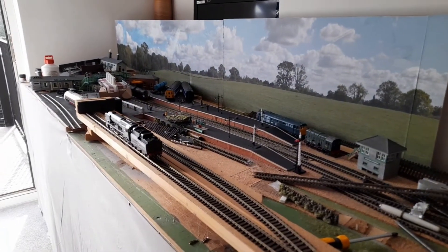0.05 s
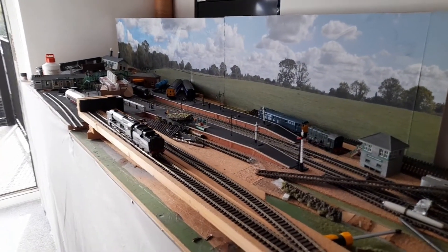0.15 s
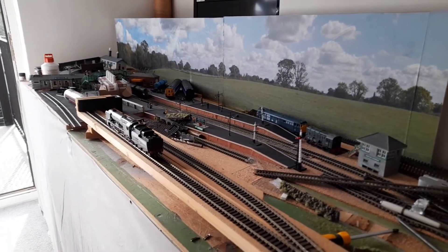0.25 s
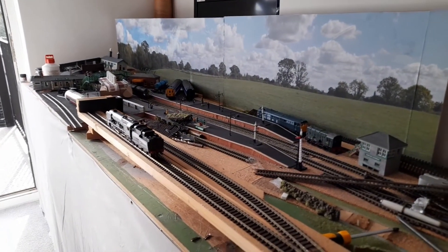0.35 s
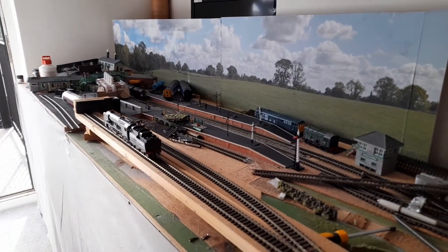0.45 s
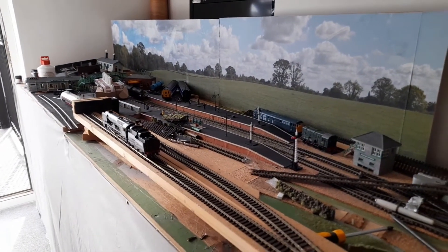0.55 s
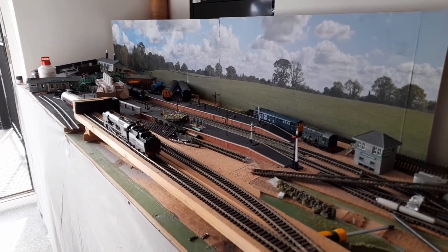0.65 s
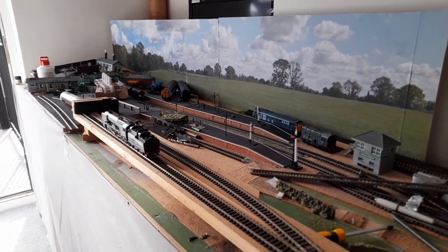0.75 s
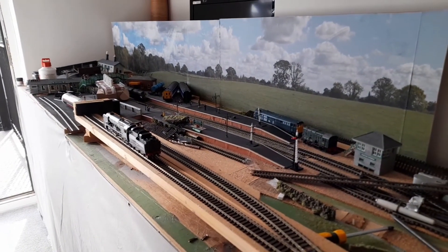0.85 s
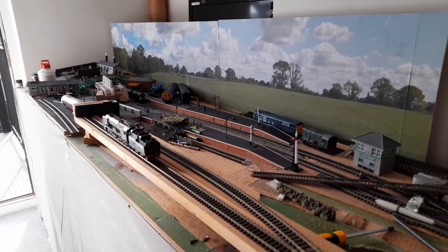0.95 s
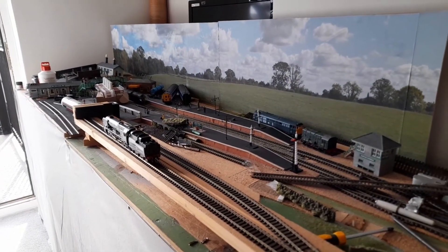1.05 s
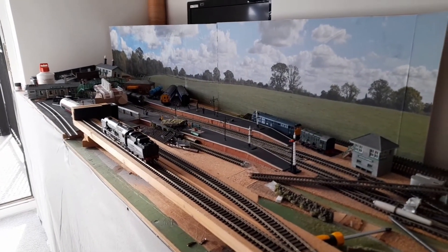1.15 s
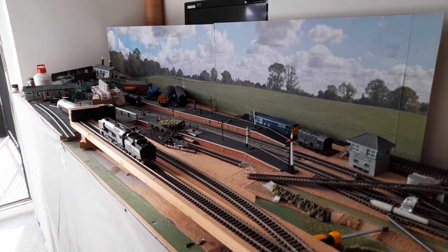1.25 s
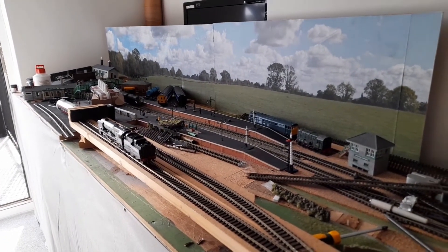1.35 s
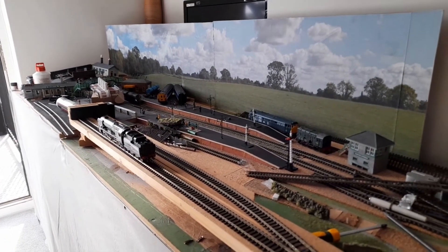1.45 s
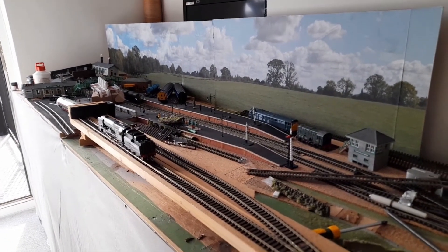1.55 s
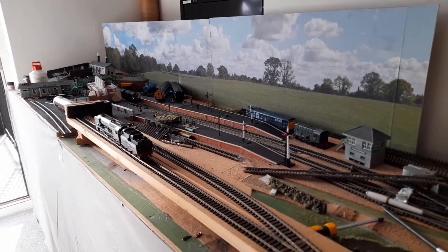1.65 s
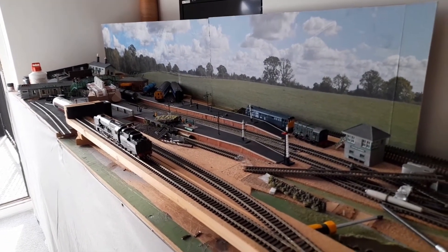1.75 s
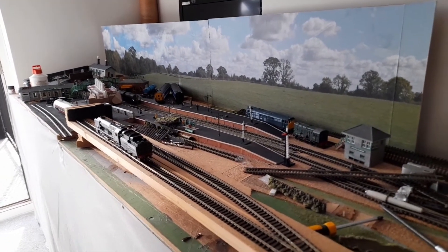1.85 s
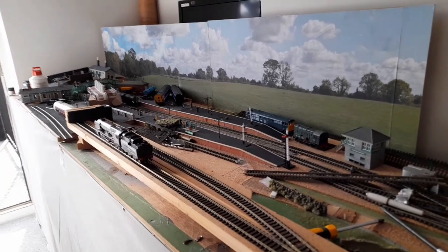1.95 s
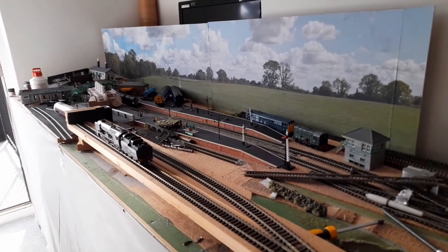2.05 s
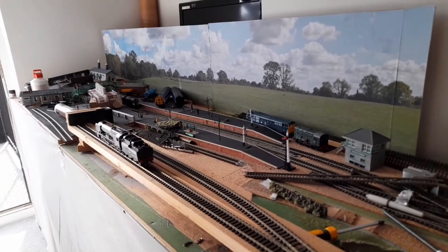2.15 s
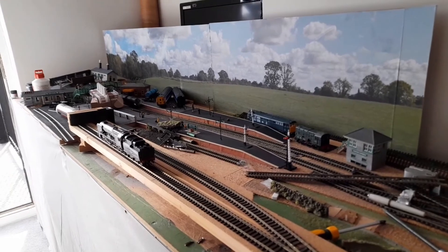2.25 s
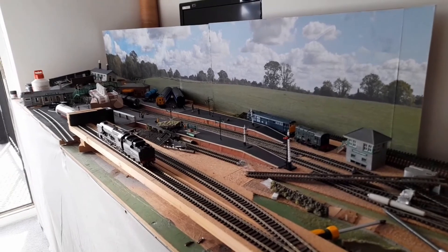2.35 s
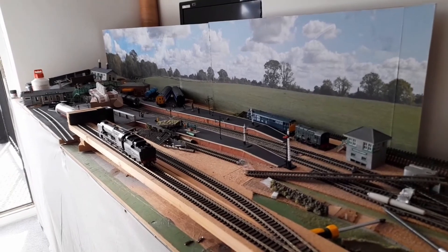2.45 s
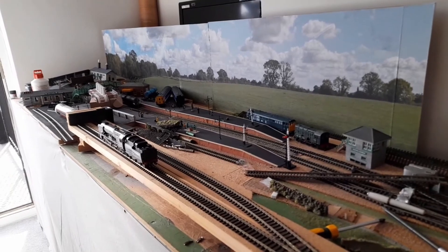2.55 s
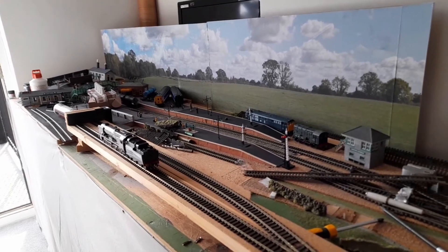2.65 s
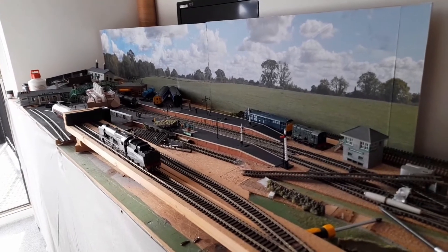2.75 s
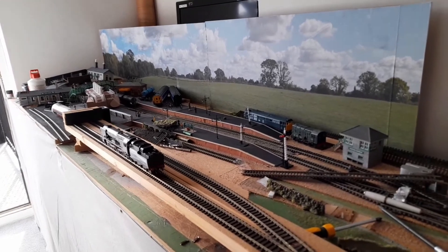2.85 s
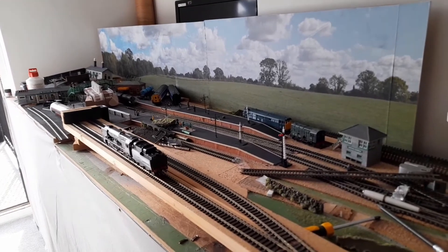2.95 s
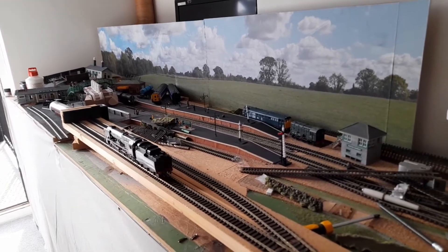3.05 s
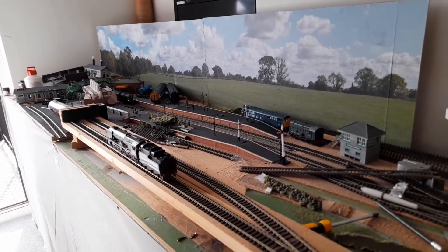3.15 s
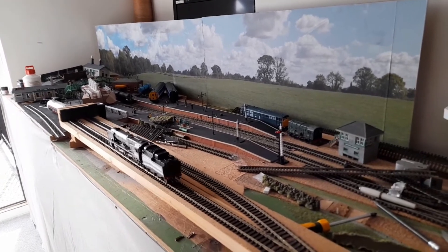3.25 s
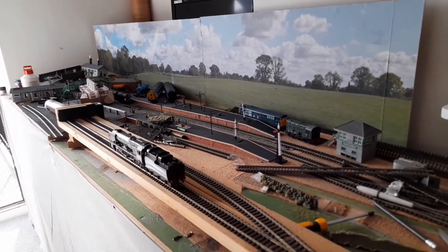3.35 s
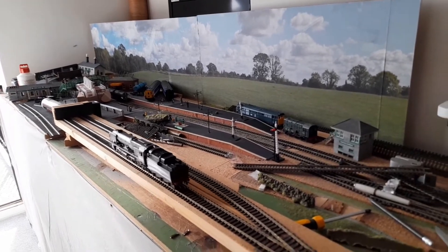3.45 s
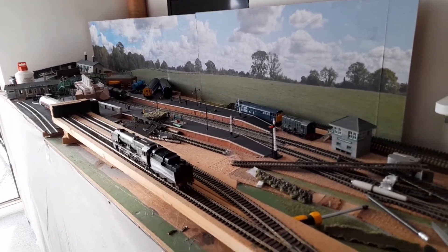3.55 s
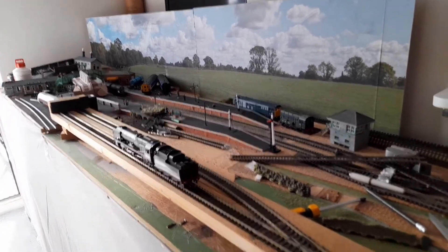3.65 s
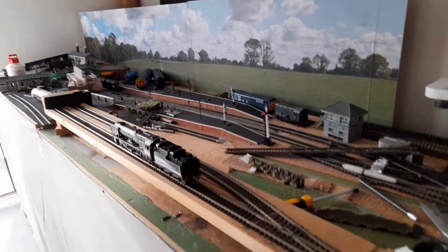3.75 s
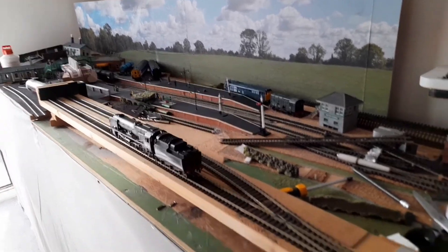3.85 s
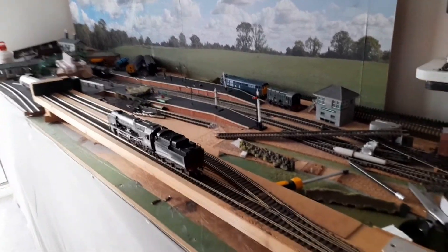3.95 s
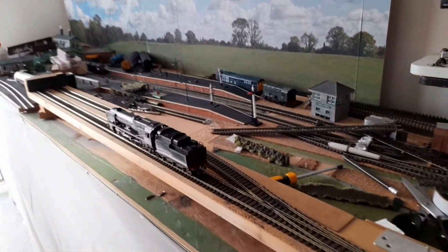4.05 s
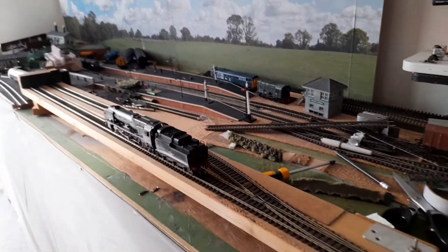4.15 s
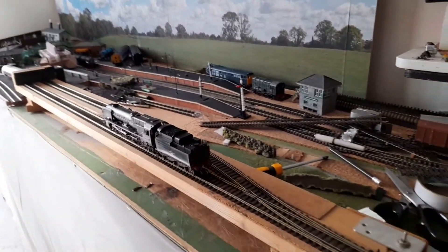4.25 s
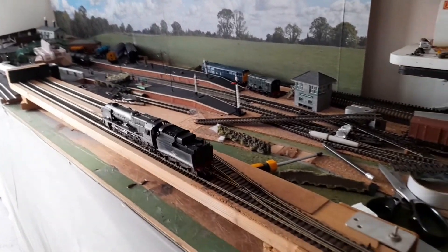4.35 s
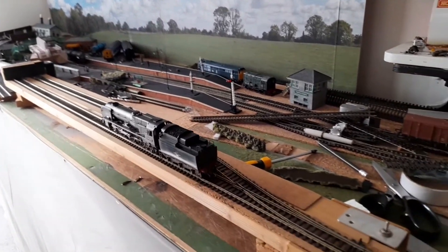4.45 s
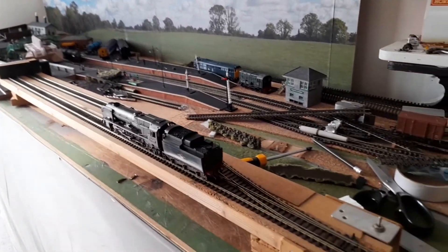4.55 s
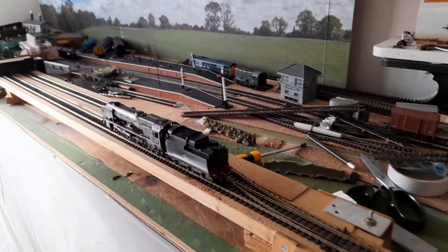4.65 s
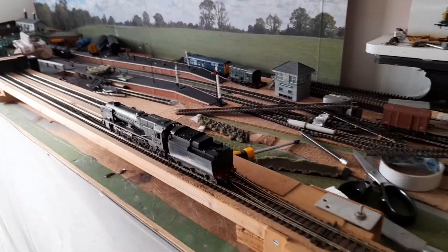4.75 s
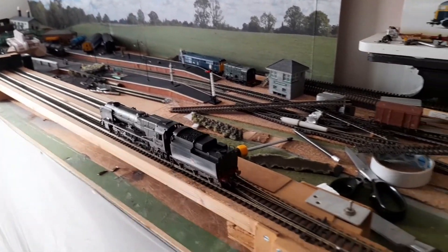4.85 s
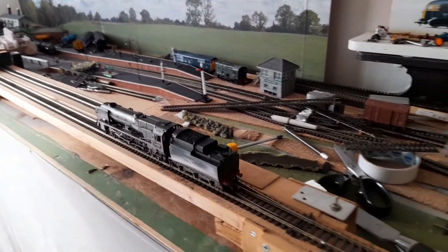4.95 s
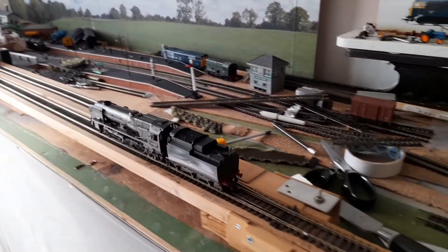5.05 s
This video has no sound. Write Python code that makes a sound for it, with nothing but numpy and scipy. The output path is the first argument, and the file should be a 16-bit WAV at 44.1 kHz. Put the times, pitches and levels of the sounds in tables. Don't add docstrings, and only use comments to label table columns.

```python
import sys
import numpy as np
from scipy import signal
from scipy.fft import rfft, irfft, next_fast_len
from scipy.io import wavfile
from scipy.ndimage import uniform_filter1d, map_coordinates

SR = 44100
rng = np.random.default_rng(int(sys.argv[2]) if len(sys.argv) > 2 else 0)


def to_wav(sig):
    pcm = np.clip(np.atleast_2d(sig), -1, 1) * 32767
    pcm = np.round(pcm).astype(np.int16)
    wavfile.write(sys.argv[1], SR, pcm.T)


def volts_from_decibels(level):
    exponent = np.asarray(level, float) / 20
    return 10 ** exponent


N = 224468

# time_s, level_db
DRIVE = [(2.45, -78), (2.55, -71), (2.65, -59.5), (2.75, -55), (2.85, -47), (2.97, -44.5), (3.14, -42.5),
         (3.26, -40.5), (3.42, -42.5), (3.55, -44), (3.72, -42.5), (3.88, -45), (4.05, -42.5), (4.4, -46),
         (4.55, -46), (4.75, -40), (4.95, -44), (5.09, -41)]
# start_s, end_s
NEARING_S = [3.25, 4.82]
# centre_hz, width_hz, level_db
SHELL_FAR = [(1017, 67, 1), (1227, 85, -1), (1343, 46, 6), (1552, 170, -4), (1777, 150, -0.5),
             (2150, 260, -6), (2980, 370, -12.5), (1230, 870, -10)]
SHELL_NEAR = [(1044, 39, 2), (1264, 41, 6.5), (1365, 56, 7), (1474, 150, 3), (1900, 107, 2),
              (2285, 160, -3), (2980, 1300, -13.5), (1400, 420, -11)]
# centre_hz, width_hz, level_db
TRESTLE = [(138.6, 22, -7.5), (230.7, 36, -3.5), (306.5, 38.4, 1)]
PANEL = [(360.4, 17, -2.5), (409, 36, -3)]
BED = [(533, 48, -0.5), (656, 42, -3.5), (708, 43, -3), (779, 38, -5.5), (878, 81, -3)]
# trestle_db, panel_db, bed_db
WOOD_DB = [-5.5, -8, -2]
WOOD_NEAR_DB = [-3, -2.5, -2.5]
# centre_s, length_s, rise_db
TRESTLE_SPANS = [(2.95, 0.41, 2.5), (3.14, 0.16, 5), (3.527, 0.27, 5.5), (3.71, 0.24, 4), (4.073, 0.36, 4),
                 (4.616, .12, 8.5), (4.864, 0.17, 1)]
PANEL_SPANS = [(2.86, 0.44, 5.5), (3.11, 0.057, 4), (3.33, .3, 6), (3.53, 0.21, 14.2), (3.87, 0.16, 5),
               (4.18, 0.18, 4.5), (4.35, 0.17, 5), (4.67, 0.25, 9.2)]
BED_SPANS = [(3.36, 0.23, 3.2), (3.56, 0.18, 3), (4.22, .15, 3.7), (4.84, 0.09, 3.5), (4.98, 0.14, 0.37)]
# freq_hz, density_db_per_hz
WHIR = [(1800, -18), (2600, -2), (3200, 0.5), (4100, 0.5), (4500, -2), (6200, -2), (7800, -12.5),
        (9000, -62)]

# start_s, peak_db, hardness_0_to_1
THROWN = [(0.9916, -21, 0)]
SLAMMED = [(1.1354, -11.5, 0.018)]
RAPS = [(.645, -45, 0.054), (1.081, -50, .8), (1.378, -35, 0.18), (1.3984, -25, 0.059), (1.664, -43, 1),
        (1.914, -46, 0.023)]
JOINTS = [(4.597, -29, .05), (4.8035, -21, .55), (4.846, -29, 0.28), (4.93, -27, 0.71), (5.045, -30, 0.34),
          (5.059, -25.5, 0.63)]
# freq_hz, level_db, t60_s
THROW_MODES = [(353, -4.5, 0.21), (692, -13, 0.17), (760, -11, 0.22), (2160, -4, 0.12), (2250, -5, 0.074),
               (2550, -5, 0.052), (2980, -8, 0.039), (3640, -18, 0.058), (4270, -12, 0.09),
               (4930, -1, 0.06), (7370, -12, 0.11), (12660, -1, 0.044), (14600, -7, .04)]
SLAM_MODES = [(135, -17.5, 0.33), (364.7, -2, 0.18), (562, -11, 0.24), (694, -10.5, 0.19), (762, -12, 0.29),
              (857, -10, 0.19), (942, -7.5, 0.26), (1020, -11, 0.24), (1250, -13.5, 0.26),
              (1480, -17, 0.23), (2157, -10, 0.19), (3580, -13, 0.093), (5780, -6.5, 0.062),
              (7370, -10.5, 0.056)]
RAP_MODES = [(330, 3, 0.062), (361, -1, 0.069), (562, -12.5, 0.27), (1250, -10.5, 0.14)]
JOINT_MODES = [(219, -2.5, 0.26), (268, -16, 0.088), (406, -11, 0.28), (1350, 8, 0.05), (2600, -2, 0.023)]
# ring_db, brightness_db, room_db
SOFT = [
    (-9.5, -6, -1),
    (-8.5, -9, -1.5),
    (-3, -31.5, 7),
    (-7, -26.5, 0),
]
# ring_db, brightness_db, room_db
HARD = (-29, 24.2, -13)
CRACK_T60_S = [0.0073, 0.0079, 0.011, 0.015]
# freq_hz, density_db_per_hz
SNAP = [(100, -14.5), (300, -17), (900, -14.5), (1600, -15), (2300, -13), (4000, -16), (6000, -14.5),
        (9300, -25), (11500, -19), (15600, -35)]
# centre_hz, width_hz, level_db
CLICK = [(7500, 1800, 2.5), (10600, 3500, 1.5)]

# start_s, hold_s, rub_db, rustle_over_rub_db
STROKES = [
    (0, 0.15, -62, -15),
    (0.645, 0.24, -63, -9.5),
    (1.03, 0.43, -65, -5),
    (1.303, 0.066, -58, -3.5),
    (1.4, .15, -55.5, 4),
    (1.62, 0.35, -67, -13),
    (2.548, 0.042, -70, -2),
]
# freq_hz, density_db_per_hz
RUB = [(100, -24), (180, -10), (350, -3), (600, 0), (1000, -6.5), (1500, -27)]
CLOTH = [(700, -37), (1100, 3), (1700, 0), (2200, -3.5), (3450, -7), (3700, -10.5), (5900, -14.5),
         (6500, -34), (9000, -60)]

# start_s, length_s, middle_hz, glide_octaves, level_db
FAR = [(.434, .029, 4350, 0.13, -53), (.46, 0.0213, 3850, -.3, -57), (.472, 0.032, 3470, 0.41, -58),
       (.51, .027, 3600, .25, -62), (.755, .038, 4580, 0.052, -54.5), (.79, 0.036, 3910, -0.37, -57),
       (.8, 0.028, 3170, -.06, -51.5), (.83, 0.018, 3150, 0.23, -56), (.872, .012, 6700, -.55, -57),
       (1.49, 0.056, 4490, -0.11, -57.5), (1.52, 0.032, 5260, .43, -55), (2.14, 0.027, 5300, -.3, -62),
       (2.16, 0.062, 5250, .4, -63), (2.235, 0.033, 4440, 0.29, -59), (2.29, .043, 4170, -0.0076, -71),
       (2.53, .058, 5700, -0.12, -64), (3.5, 0.046, 3723, 0.084, -47.5), (4.98, 0.065, 5540, -0.067, -52.5)]
NEAR = [(1.625, 0.0327, 4600, 0.24, -57.5), (2.11, 0.03, 4350, 0.34, -63), (2.612, .032, 4600, 0.13, -56.5),
        (2.848, .0124, 4470, 0.27, -49), (2.858, 0.042, 4740, .02, -47), (2.878, .018, 4250, -0.13, -46),
        (2.918, .024, 3880, 0.24, -48), (2.943, .025, 3350, -0.084, -55), (3.467, 0.027, 4180, 0.21, -51),
        (3.537, .012, 4090, .08, -45), (3.55, 0.012, 3290, -0.14, -47), (4.37, 0.029, 4710, 0.22, -51.5),
        (4.652, .018, 4560, -0.045, -46.5), (4.962, .045, 4620, .04, -46), (5.01, .04, 4720, -.02, -50)]

# freq_hz, density_db_per_hz
HISS = [(1200, -41), (1600, -11), (2500, -25.5), (4000, -14.5), (6500, -11), (8200, -15.5), (9500, -15),
        (10500, -13), (12500, -9.5), (15600, -11)]
RUMBLE = [(13, -38), (22, -25.5), (69, -3), (261, -14.5), (359, -13.5), (443, -28.5), (1150, -23.5),
          (1500, -48), (1950, -66), (3300, -120)]
# centre_s, length_s, rise_db
HOUSE_SWELLS = [(2.3, 1.9, 0.83), (3.199, 1, 5.1), (4.85, 0.62, 6)]
SETTLING = [(.05, .8, -3.5)]

# freq_hz, t60_s
ROOM = [(150, 0.5), (1000, 0.3), (4000, 0.25), (12000, 0.19)]
# freq_hz, likeness_0_to_1
ALIKE = [(40, 0), (130, 0.93), (400, 0.82), (800, 0.54), (1200, 0.37), (1700, 0.15), (3000, 0.26),
         (6000, 0), (15000, 0)]
# freq_hz, left_minus_right_db
LEAN = [(60, -4.5), (110, -1.5), (200, -4.5), (380, -4), (700, 0), (1290, -1.5), (2380, 2), (4400, 1.5),
        (8120, -3), (15000, 0.5)]


def unit(x):
    return x / np.sqrt(np.mean(x ** 2) + 1e-20)


def along(points, hz):
    f, v = np.transpose(points)
    return np.interp(np.log(hz + 1), np.log(f + 1), v)


def wobble(rate_hz):
    knots = rng.standard_normal(int(N * rate_hz / SR) + 4)
    return map_coordinates(knots, [np.arange(N) * rate_hz / SR])


def filtered(x, response):
    m = next_fast_len(x.shape[-1] + SR // 4)
    spectrum = rfft(x, m) * response(np.fft.rfftfreq(m, 1 / SR))
    return irfft(spectrum, m)[..., :x.shape[-1]]


def resonant(modes):
    def response(f):
        return sum((-1) ** k * volts_from_decibels(db) * 1j * f * width / (centre ** 2 - f * f + 1j * f * width)
                   for k, (centre, width, db) in enumerate(modes))
    return response


def ports(pair, likeness, lag_s):
    def mid_side(hz):
        turn = np.arccos(np.clip(likeness * along(ALIKE, hz), 0, 1)) / 2
        return np.array([np.cos(turn), np.sin(turn)])

    mid, side = filtered(pair, mid_side)
    left_right = np.array([mid + side, mid - side])
    return filtered(left_right, lambda hz: np.exp(np.outer([-1j, 1j], np.pi * hz * lag_s)))


def rush(spectrum, patchy_db, likeness, lag_s):
    z = signal.stft(rng.standard_normal((2, N)), nperseg=512)[2]
    field = uniform_filter1d(rng.standard_normal(z.shape[1:]), size=6, axis=0)
    field = uniform_filter1d(field, size=10, axis=1)
    pair = signal.istft(z * volts_from_decibels(patchy_db * unit(field)), nperseg=512)[1][:, :N]
    coloured = filtered(pair, lambda hz: volts_from_decibels(along(spectrum, hz)))
    return unit(ports(coloured, likeness, lag_s))


def tail(stretch):
    hz, t, z = signal.stft(rng.standard_normal((2, SR // 3)), SR, nperseg=128)
    decay = volts_from_decibels(-60 * t / (stretch * along(ROOM, hz)[:, None]))
    x = signal.istft(z * decay, SR, nperseg=128)[1][:, :SR // 3]
    return x / np.linalg.norm(x[0])


def swells(rows):
    t = np.arange(N) / SR
    return sum(db * np.cos(np.pi * np.clip((t - s) / length, -.5, .5)) ** 2 for s, length, db in rows)


def nearness():
    return np.interp(np.arange(N) / SR, NEARING_S, [0, 1])


def locomotive():
    time_s, level_db = np.transpose(DRIVE)
    shell_db = np.interp(np.arange(N) / SR, time_s, level_db, left=-120)
    near = nearness()
    load = wobble(23.89)
    rolling = ports(teeth(500, spread_db=12, smooth=0.7), likeness=0.92, lag_s=5e-5)

    wood = 0
    spans_of_parts = (TRESTLE_SPANS, PANEL_SPANS, BED_SPANS)
    for db, near_db, spans, part in zip(WOOD_DB, WOOD_NEAR_DB, spans_of_parts, (TRESTLE, PANEL, BED)):
        part_db = shell_db + db + near * near_db + swells(spans) + .5 * load
        wood = wood + volts_from_decibels(part_db) * unit(filtered(rolling, resonant(part)))

    gears = rolling + 0.7 * ports(teeth(1500, spread_db=-4, smooth=0.92), likeness=2.6, lag_s=6e-5)
    far_shell = unit(filtered(gears, resonant(SHELL_FAR)))
    near_shell = unit(filtered(gears, resonant(SHELL_NEAR)))
    rattle_db = shell_db + 0.93 + .5 * load + 1.3 * wobble(110)
    shell = volts_from_decibels(rattle_db) * ((1 - near) * far_shell + near * near_shell)

    speed_db = uniform_filter1d(shell_db, size=SR // 4)
    whir = volts_from_decibels(speed_db - 11) * rush(WHIR, patchy_db=2.4, likeness=0.73, lag_s=6e-5)
    return wood + whir + shell


def teeth(rate_hz, spread_db, smooth):
    meets = rng.random((2, N)) < rate_hz / SR
    force = volts_from_decibels(spread_db * rng.random((2, N))) * np.sign(rng.standard_normal((2, N)))
    return unit(meets * force) + smooth * rng.standard_normal((2, N))


def knocks():
    out = np.zeros((2, N + SR))
    blows_on = (THROWN, SLAMMED, RAPS, JOINTS)
    modes_of = (THROW_MODES, SLAM_MODES, RAP_MODES, JOINT_MODES)
    for blows, modes, soft, crack_t60_s in zip(blows_on, modes_of, SOFT, CRACK_T60_S):
        for start_s, peak_db, hardness in blows:
            blow = volts_from_decibels(peak_db) * strike(modes, np.add(soft, np.multiply(hardness, HARD)), crack_t60_s)
            out[:, round(start_s * SR):][:, :blow.shape[1]] += blow
    thin = signal.sosfilt(signal.butter(2, 80, "high", fs=SR, output="sos"), out[:, :N])
    return ports(thin, likeness=1.15, lag_s=0.000322) * volts_from_decibels([[-1.6], [1.6]])


def strike(modes, balance_db, crack_t60_s):
    t = np.arange(SR // 3) / SR
    ring_db, bright_db, room_db = balance_db
    hz, level_db, t60_s = np.transpose(modes)[:, :, None]
    steps = rng.standard_normal((2, len(hz), len(t)))
    drift = np.cumsum(steps, axis=2) * (hz / 4e5) ** .6
    build = 1 - np.exp(-t * hz / 3.8)
    partials = volts_from_decibels(level_db - 60 * t / t60_s) * build * np.sin(2 * np.pi * hz * t + drift)
    ring = partials.sum(axis=1)

    def colour(f):
        return volts_from_decibels(along(SNAP, f) + along([(700, -8.0), (3500, bright_db)], f))

    crack = volts_from_decibels(16.5 - 60 * t / crack_t60_s) * rng.standard_normal((2, len(t)))
    answer = filtered(volts_from_decibels(39.5 + room_db) * tail(stretch=1.42) + crack, colour)
    onset = 1 - np.exp(-t / 0.00017)
    trim = volts_from_decibels(-9 * (t / 0.13) ** 2)
    return (volts_from_decibels(ring_db + 5.0) * ring + volts_from_decibels(5.5) * answer) * onset * trim


def click():
    (start_s, peak_db, _), = SLAMMED
    t = np.arange(N) / SR - start_s - .0003
    decay = volts_from_decibels(peak_db + 4.5 - 60 * np.abs(t) / 0.003)
    burst = (t > 0) * decay * np.sign(rng.standard_normal(N))
    return filtered(burst, resonant(CLICK)) * volts_from_decibels([[-18], [0]])


def sleeve():
    t = np.arange(N) / SR
    press_s, lift_s = 0.029, .13
    rub, rustle = volts_from_decibels(-66.5), volts_from_decibels(-70.5)
    for s, hold_s, rub_db, over_db in STROKES:
        corners_s = [s - press_s, s, s + hold_s, s + hold_s + lift_s]
        shape = np.interp(t, corners_s, [0, 1, 1, 0]) ** 2
        rub = rub + volts_from_decibels(rub_db) * shape
        rustle = rustle + volts_from_decibels(rub_db + over_db) * shape
    return (rub * rush(RUB, patchy_db=2.5, likeness=0.69, lag_s=0.00018)
            + rustle * rush(CLOTH, patchy_db=1.5, likeness=0.55, lag_s=0.00016))


def sparrows(notes, warble, flutter_db, direct_db, echo_db, stretch):
    out = np.zeros((2, N + SR))
    bend = 1 + warble * wobble(260)
    flutter = volts_from_decibels(flutter_db * wobble(180))
    for start_s, length_s, hz, glide, db in notes:
        u, at = np.linspace(0, 1, int(length_s * SR)), round(start_s * SR)
        pitch_hz = hz * 2 ** (glide * (u - .5)) * bend[at:][:len(u)]
        level = volts_from_decibels(db + 4) * flutter[at:][:len(u)] * np.sqrt(np.sin(np.pi * u) + 1e-9)
        note = level * np.sin(2 * np.pi * np.cumsum(pitch_hz) / SR)
        heard = volts_from_decibels(echo_db) * signal.fftconvolve(note[None], tail(stretch), axes=1)
        heard[:, :len(note)] += volts_from_decibels(direct_db) * note
        out[:, at:][:, :heard.shape[1]] += heard
    return out[:, :N] * volts_from_decibels([[1.5], [-1.5]])


def background(events):
    listen_s, quiet_db = 0.34, -58
    power = np.abs(uniform_filter1d(np.mean(events ** 2, axis=0), size=int(listen_s * SR)))
    over_db = 10 * np.log10(1 + power / volts_from_decibels(quiet_db) ** 2)
    hiss_db = -63.5 + 0.55 * over_db + 4 * nearness() ** 2 + swells(SETTLING)
    house_db = -59 + 0.15 * over_db + swells(HOUSE_SWELLS) + 0.16 * wobble(6.7)
    hiss = volts_from_decibels(hiss_db) * rush(HISS, patchy_db=1.9, likeness=0.073, lag_s=0)
    return hiss + volts_from_decibels(house_db) * rush(RUMBLE, patchy_db=2.0, likeness=0.34, lag_s=1e-4)


def scene():
    engine, blows, hand = locomotive(), knocks(), sleeve()
    far = sparrows(FAR, warble=.025, flutter_db=3, direct_db=-11, echo_db=-3.5, stretch=1.7)
    near = sparrows(NEAR, warble=.007, flutter_db=3.5, direct_db=-5, echo_db=-4.5, stretch=1.3)
    noise = background(engine + volts_from_decibels(-20.5) * blows + volts_from_decibels(-13.5) * hand)
    return engine + blows + click() + hand + far + near + noise


def band_limit(x):
    return signal.sosfilt(signal.butter(12, 16680, fs=SR, output="sos"), x)


def record(dry):
    def port_response(hz):
        return volts_from_decibels(np.outer([.5, -.5], along(LEAN, hz))) * (hz < 15640)

    mix = filtered(dry, port_response)
    return band_limit(mix)


dry = scene()
out = record(dry)
to_wav(out)
```